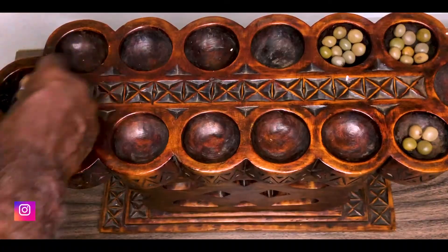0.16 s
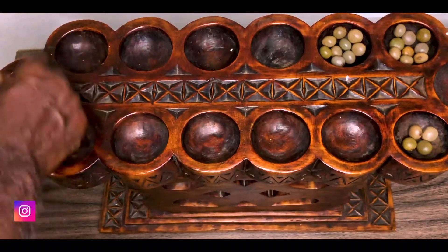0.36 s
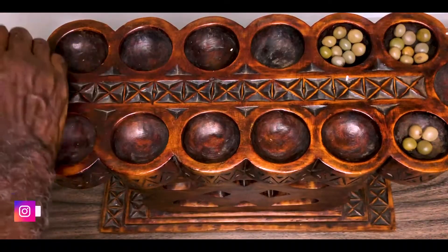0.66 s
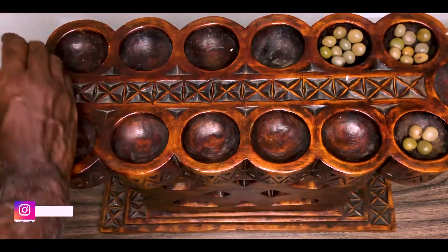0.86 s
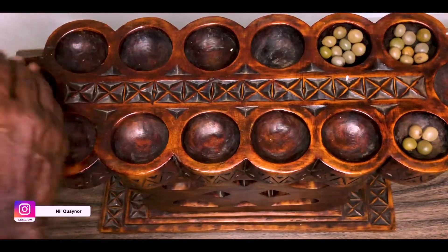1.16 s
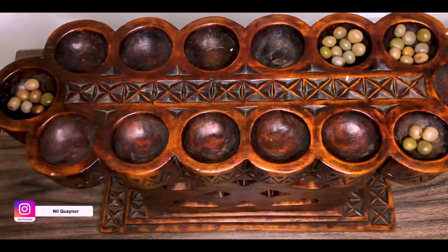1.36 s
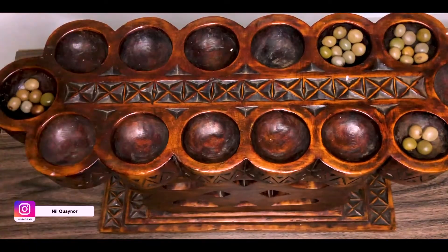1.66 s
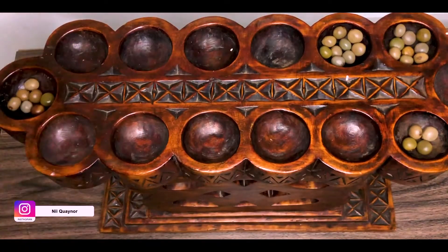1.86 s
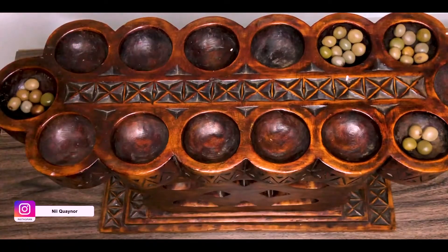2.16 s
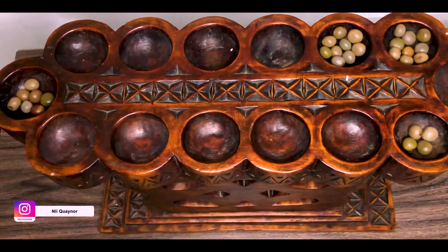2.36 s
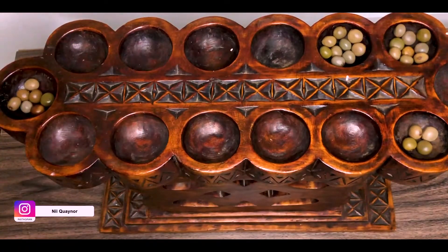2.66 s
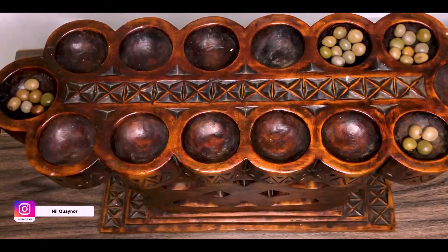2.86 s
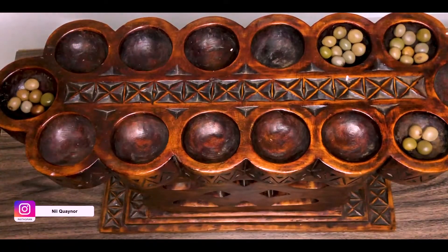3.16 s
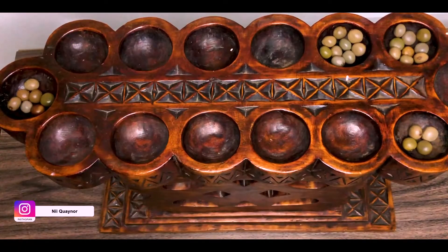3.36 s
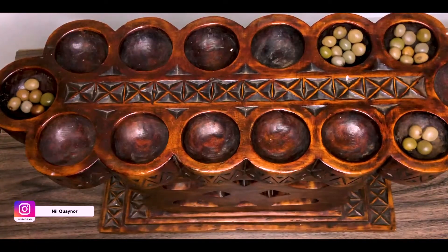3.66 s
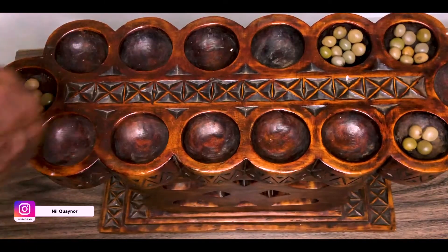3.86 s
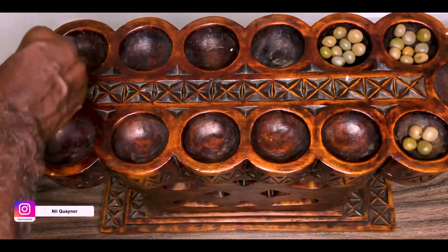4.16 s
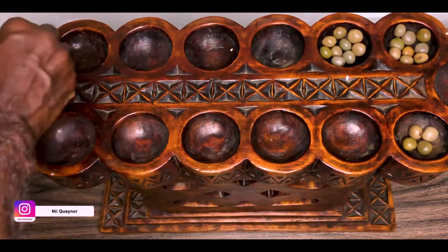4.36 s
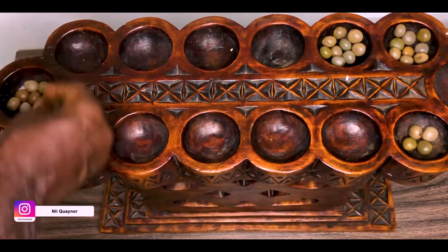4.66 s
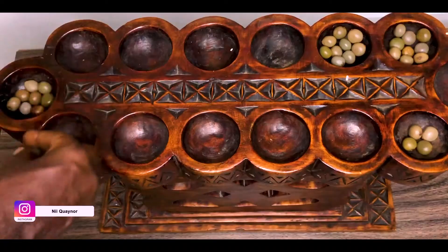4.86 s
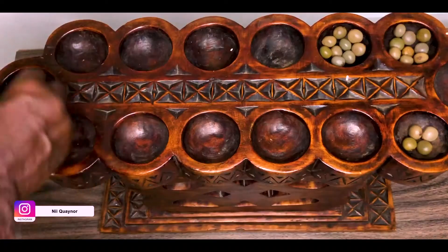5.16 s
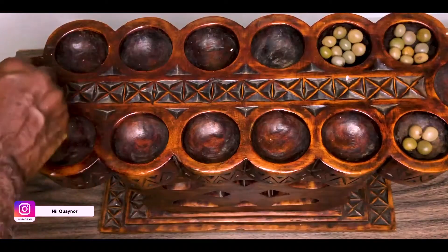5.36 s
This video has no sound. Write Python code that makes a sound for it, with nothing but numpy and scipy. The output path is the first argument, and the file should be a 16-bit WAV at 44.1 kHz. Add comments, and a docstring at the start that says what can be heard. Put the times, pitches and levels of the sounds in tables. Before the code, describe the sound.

Hard little seeds clack sharply into a carved wooden cup, then get softly stirred and gathered, with a few more bright clicks in a quiet room.

```python
"""A quiet room, where hard seeds click on each other and knock in the cups of a carved wooden board.
A hand drops seeds into the end cup, then stirs and gathers them.
Each hit is a handful of fading sine waves for shell, board and cup; stirring is many tiny random hits.
Nearby surfaces give single echoes and the walls a short tail made of scattered, fading echoes.
Beneath lie the low rumble of the room and the hiss of the microphone, both made of shaped noise."""
import sys
import numpy as np
from scipy import signal
from scipy.fft import rfft, irfft
from scipy.io import wavfile

SR = 44100
rng = np.random.default_rng(int(sys.argv[2]) if len(sys.argv) > 2 else 0)


def transcribe(signal):
    """Save signal, clipped to [-1, 1], as a 16-bit WAV file at the path in sys.argv[1]."""
    frames = np.atleast_2d(signal).T
    limited = np.clip(frames, -1, 1)
    pcm = np.round(limited * 32767).astype(np.int16)
    wavfile.write(sys.argv[1], SR, pcm)


N = 242550  # length of the scene in samples (5.5 s)

# clean blows of a seed: (t/s, shell click level/dB, shell pitch f/Hz, board knock level/dB, cup ring level/dB)
BLOWS = [(0.341, -44.5, 5870, -56, -52), (0.656, -9.5, 6550, -25, -25.5), (0.6679, -22, 6700, -33.5, -28.5),
         (0.6974, -43, 7140, -50, -53), (0.7248, -25, 6540, -41, -24), (0.7283, -6.5, 6760, -26.5, -21.5),
         (0.787, -20.5, 7000, -36, -29.5), (0.872, -24, 8300, -43, -30.5), (0.8779, -25, 7350, -40, -56),
         (0.9927, -33, 7200, -51, -41), (1.3065, -27, 6580, -22.5, -29), (1.314, -30, 5600, -34.5, -30),
         (1.3869, -36, 6080, -40.5, -34), (1.4148, -45, 5580, -54, -46), (1.475, -54, 4660, -55, -51.5),
         (1.5493, -65, 4900, -54, -49), (1.652, -45, 4530, -40, -41.5), (1.8053, -37, 5600, -39.5, -32.5),
         (1.822, -32, 6800, -50, -38), (1.85, -41, 6430, -59, -39.5), (1.8735, -41, 6310, -63, -46),
         (2.004, -32.5, 4830, -57, -35.5), (2.0572, -31.5, 7050, -44, -44), (2.0831, -58, 5130, -40.5, -46),
         (2.1118, -51, 6220, -50, -43), (2.12, -45, 4800, -50, -49), (2.1492, -50, 5300, -63, -46),
         (2.1915, -53, 4650, -43.5, -41), (2.225, -29, 6900, -48, -41), (2.2358, -25.5, 5100, -38, -38.5),
         (2.2835, -46, 6500, -62, -51), (2.312, -36.5, 5630, -63, -37.5),
         (2.3748, -35.5, 4860, -38.5, -31.5), (2.3945, -42, 5230, -34, -31.5), (2.42, -34, 5250, -49, -43),
         (2.5162, -35, 6600, -43, -37.5), (2.5243, -29, 6900, -37.5, -37), (2.536, -32, 4540, -34, -30.5),
         (2.5406, -16.5, 6460, -44, -35), (2.5836, -36, 6800, -49, -48), (2.594, -39, 4400, -32, -35),
         (2.6025, -36.5, 6300, -50, -30), (2.6297, -38, 5770, -47, -41.5), (2.685, -47, 6500, -61, -54),
         (2.7036, -38, 6560, -50, -39), (2.7848, -30, 6550, -35, -43), (2.7893, -21.5, 7100, -57, -41),
         (2.8272, -45, 7560, -36, -40), (2.838, -41, 6480, -39, -43), (2.8942, -52, 5120, -47.5, -55),
         (2.946, -57, 6200, -46, -58), (2.983, -38.5, 5900, -43.5, -40.5), (3.0234, -40.5, 5600, -42, -48),
         (3.0408, -57, 4810, -41.5, -62), (3.07, -40, 5140, -61, -58), (3.1256, -64, 6290, -42, -52),
         (3.1681, -60, 6290, -36.5, -51), (3.1936, -66, 7240, -49, -51), (3.208, -18, 7260, -31.5, -29.5),
         (3.2357, -43, 6260, -38, -48), (3.2605, -44, 7800, -45, -57), (3.2769, -51, 7120, -45, -56),
         (3.299, -48, 6900, -42, -55), (3.3171, -53, 7270, -41, -58), (3.334, -48, 6680, -51, -53),
         (3.3485, -49, 7430, -37, -58), (3.3714, -61, 7100, -36, -51), (3.3932, -62, 7800, -46, -59),
         (3.419, -57, 6300, -43, -61), (3.43, -66, 7130, -45, -60), (3.4465, -23.5, 6400, -33.5, -35),
         (3.463, -53, 6550, -34, -45), (3.4926, -33.5, 6640, -37, -35.5), (3.6409, -26.5, 6050, -38.5, -38),
         (4.1814, -9.5, 7850, -31.5, -25), (4.1894, -24, 8600, -38.5, -45), (4.21, -30, 8170, -40, -62),
         (4.2705, -35, 7520, -44.5, -47), (4.2893, -17, 8100, -41.5, -41.5), (4.3015, -38, 7000, -51, -55),
         (5.3656, -8, 8330, -29.5, -30.5), (5.3857, -22, 6830, -35, -38), (5.4138, -22, 6340, -37.5, -31)]
# short slides of a seed: the same five columns, then (longest duration/ms, snap level against the click/dB)
SLIDES = [(0.7204, -20, 7050, -34, -39, 3.5, -10), (0.8534, -14, 6650, -33.5, -23, 3.07, -17),
          (1.2918, -28.5, 6040, -27.5, -29, 2.2, -5), (1.3208, -24.5, 6900, -37.5, -27.5, 8.2, -17),
          (1.7294, -33, 6500, -38.5, -37, 2.74, -31), (1.776, -34, 7530, -33, -35.5, 7, -26),
          (1.913, -30.5, 5900, -41, -33.5, 8.8, -4.5), (2.014, -55, 7680, -32, -37.5, 12.2, -15),
          (2.2033, -32.5, 6450, -38.5, -38.5, 5.3, -9), (2.3586, -26, 6760, -37, -36, 4.3, -16),
          (2.7387, -34, 4300, -44, -37, 13, -27), (2.757, -48, 4300, -38, -37.5, 6, -19),
          (2.998, -33.5, 4500, -45.5, -43, 15.7, -12), (3.784, -38, 6100, -40.5, -42.5, 12, -3),
          (4.2325, -16.5, 7400, -41, -25.5, 2.2, -6.5)]
SNAP_BLOW_DB = -15.5  # starting level of the snap in a clean blow, against the click


def seed_hits(direct, all_round):
    """Adds every blow and slide, both as heard directly and as sent out towards the walls."""
    contacts = [(row, 0, SNAP_BLOW_DB) for row in BLOWS]
    contacts += [(row, row[5], row[6]) for row in SLIDES]
    chance = rng.standard_normal((len(contacts), 4, 39))
    slips = rng.random((len(contacts), 14))
    tail_damping = 0.4  # shell and cup rings blur together from all sides: share of their ring time
    for (row, length_ms, snap_db), luck, slip in zip(contacts, chance, slips):
        add(direct, row[0], contact(row, luck, slip, length_ms, snap_db))
        # towards the walls: one even blow, halfway through the longest duration of the slide
        even_blow = blow(row, 0 * luck, 0.5, snap_db, tail_damping)
        add(all_round, row[0] + length_ms / 2000, even_blow)


def contact(row, chance, slips, length_ms, snap_db):
    """A clean blow, or a slide: a seed that slips many times makes a run of small blows."""
    at = (slips ** 1.5 * length_ms * SR / 1000).astype(int)  # slips crowd towards the start
    train = np.bincount(at - at.min()).astype(float)
    return np.convolve(blow(row, chance, 0.72, snap_db), train / np.linalg.norm(train))


# highest shell modes: (f/Hz, relative level/dB, time to fall 60 dB t/s)
SNAP = [(10940, 8.5, 0.0093), (11800, 15, 0.0031), (14040, -1, 0.0057), (13200, -17, 0.00059),
        (15100, 0, 0.0025)]
SNAP_TO_CUP = 0.41  # share of the snap's level that follows the cup ring rather than the click
SNAP_DB_PER_OCTAVE = 12  # higher shells snap more
# the whole board on the table: (f/Hz, relative level/dB, time to fall 60 dB t/s)
THUMP = [(215, 0, 0.022), (305, 0, 0.021)]
THUMP_DB = -19  # thump level against the board knock
CUP_HZ, CUP_SPREAD = 3190, 0.035  # centre of the cup ring, and how far the struck spot moves it


def blow(row, chance, focus, snap_db, ring_share=1):
    """A seed's shell clicks and snaps, the cup wall rings and the board knocks; focus narrows the colour."""
    s, shell_db, shell_hz, knock_db, cup_db = row[:5]
    snap_db = snap_db + shell_db + SNAP_TO_CUP * (cup_db - shell_db)
    snap_db += SNAP_DB_PER_OCTAVE * np.log2(shell_hz / 6500)
    cup_hz = CUP_HZ * np.exp(CUP_SPREAD * chance[3, -1])

    shell_modes = damped(shell_near(shell_hz, focus * 25.7), ring_share)
    board_modes = board_near(knock_pitch(s), focus * 23.8)
    cup_modes = damped(cup_near(cup_hz, focus * 16.2), ring_share)
    click = ring(shell_modes, chance[0], ring_share * 0.0003, detune=0.024)
    snap = ring(SNAP, chance[1], 0.0001, detune=0.013)
    knock = ring(board_modes, chance[2], 0.00065, detune=0.018)
    thump = ring(THUMP, chance[1, ::-1], 0.0013)
    cup_ring = ring(cup_modes, chance[3], 0.00038)

    sound = np.zeros(2000)
    add(sound, 0, gain_of(shell_db) * click)
    add(sound, 0, gain_of(snap_db) * snap)
    add(sound, 0, gain_of(knock_db) * knock)
    add(sound, 0, gain_of(knock_db + THUMP_DB) * thump)
    add(sound, 0, gain_of(cup_db) * cup_ring)
    return sound


# modes (natural tones) of the dry shells: (f/Hz, relative level/dB)
SHELL = [(4300, -7.5), (5200, -2), (5750, 0), (6250, 3), (6750, 1.5), (7500, 0), (8100, 1.5), (8700, 1),
         (9500, -4), (10400, -5.5)]


def shell_near(centre_hz, fall_db):
    """The shell's modes around the pitch of this seed; all die very fast, 60 dB in 4.5 ms."""
    return [(hz, db, 0.0045) for hz, db in near(SHELL, centre_hz, fall_db)]


# modes of the board: (f/Hz, relative level/dB)
BOARD = [(340, -9), (440, -9), (562, -8.5), (640, -10), (745, -4), (830, -7.5), (910, 0.5), (1060, 1.5),
         (1170, 3.5), (1270, 3), (1390, -22), (1565, -6.5), (1750, -4.5)]
BOARD_T60 = 0.029  # time for a 700 Hz board mode to fall 60 dB, s


def board_near(centre_hz, fall_db):
    """The board's modes around the pitch that the struck cup favours; wood damps high modes much sooner."""
    weighted = near(BOARD, centre_hz, fall_db)
    return [(hz, db, BOARD_T60 * min(700 / hz, 1.2) ** 1.7) for hz, db in weighted]


# the board knocks low at its end cup, higher where the seeds are stirred: (t/s, centre of the knock f/Hz)
KNOCK_PITCH = [(0.6, 690), (1.1, 755), (1.28, 1053), (1.7, 1060), (2.0, 1270), (2.3, 1154), (2.6, 1060),
               (2.82, 1280), (2.98, 1073), (3.17, 1167), (3.2, 866), (3.5, 1000), (3.8, 1240), (4.1, 614),
               (5.5, 686)]


def knock_pitch(s):
    """The pitch that the struck part of the board favours at time s."""
    return np.interp(s, *np.transpose(KNOCK_PITCH))


# modes of the cup wall: (f/Hz, relative level/dB)
CUP = [(1600, 7.5), (1900, 3.5), (2200, 5), (2500, 3.5), (2850, 4), (3200, -3), (3550, 0.5), (3900, 1.5),
       (4300, -1)]


def cup_near(centre_hz, fall_db):
    """The cup wall's modes around the pitch of the struck spot; each falls 60 dB in 9 ms."""
    return [(hz, db, 0.009) for hz, db in near(CUP, centre_hz, fall_db)]


# seeds rolling and rubbing under the fingers: (t/s, wood rattle level/dB, shell rustle level/dB)
STIRRING = [(1.3, -71, -62), (1.45, -68, -78), (1.6, -72, -85), (1.72, -73, -75), (1.8, -62, -60),
            (1.894, -61.5, -68), (2.09, -53.5, -66), (2.17, -64, -71), (2.26, -56, -56), (2.34, -54.5, -65),
            (2.46, -64, -70), (2.62, -68, -59), (2.73, -55.5, -63.5), (2.9, -68, -77), (3.03, -51, -64),
            (3.16, -73, -82), (3.28, -59.5, -60), (3.42, -63.5, -79), (3.55, -90, -90)]
ROLL_LOW_HZ, ROLL_HIGH_HZ = 776, 1371  # range of the rolling knocks' centres
ROLL_SPREAD = 0.08  # scatter of these knocks about the knock pitch


def stirring(wood_per_s=300, shell_per_s=1400, spread_db=5.0):
    """Many tiny uneven touches: seeds roll on the board and rub on each other."""
    s, wood_db, shell_db = np.transpose(STIRRING)
    t, wood, shells = np.arange(N) / SR, np.zeros(N), np.zeros(N)
    size = gain_of(spread_db * np.minimum(rng.exponential(1, N), 4))
    draw = rng.random(N)  # decides at which samples a touch happens
    kind = rng.integers(0, 8, N)
    chance = rng.standard_normal((8, 3, 39))
    spots = np.geomspace(ROLL_LOW_HZ, ROLL_HIGH_HZ, 8)
    wanted = knock_pitch(t) * np.exp(ROLL_SPREAD * rng.standard_normal(N))
    spot = np.rint(np.interp(wanted, spots, np.arange(8)))

    for k in range(8):
        rolls = size * (spot == k) * (draw < wood_per_s / SR)
        knock = ring(board_near(spots[k], 16), chance[k, 0], 0.001, uneven_db=4.0)
        add(knock, 0, ring(cup_near(5800, 6.4), chance[k, 1], 0.00035))
        wood += signal.oaconvolve(rolls, knock)[:N]

        rubs = size * (kind == k) * (draw > 1 - shell_per_s / SR)
        rub = ring(shell_near(5000, 5), chance[k, 2], 0.0002)
        shells += signal.oaconvolve(rubs, rub)[:N]

    wood_level = gain_of(np.interp(t, s, wood_db, left=-120, right=-120))
    shell_level = gain_of(np.interp(t, s, shell_db, left=-120, right=-120))
    return wood_level * evened(wood) + shell_level * evened(shells)


# single echoes from cup rim, hand and table: (delay t/s, level/dB)
NEAR_ECHOES = [(.0015, -9), (.0036, -16), (.0115, -21)]


def near_echoes(x):
    """A few single reflections from surfaces close to the seeds: delayed, quieter copies."""
    out = x.copy()
    for delay, db in NEAR_ECHOES:
        add(out, delay, gain_of(db) * x)
    return out


# how long the walls keep each pitch: (f/Hz, time to fall 60 dB t/s)
WALLS = [(400, 0.47), (1000, 0.37), (3000, 0.26), (7000, 0.37), (11000, 0.12), (16000, 0.16)]
# how strongly each pitch starts in the tail: (f/Hz, relative level/dB)
WALL_COLOUR = [(400, 11), (900, -1), (1600, 12.5), (4000, 6), (8000, 1.3), (14000, 12)]


def walls(x):
    """Three sparse tails, each band dying at its own speed, fed in turn so that like hits differ."""
    out = np.zeros(N)
    turn = 2 * np.pi * 3.7 * np.arange(N) / SR  # 3.7 turns a second
    for k in range(3):
        taps = np.zeros(SR)
        at = np.arange(120, SR - 20, 20)
        taps[at + rng.integers(0, 20, len(at))] = rng.choice([-1., 1.], len(at))
        hz, t, z = signal.stft(taps, SR, nperseg=256)
        z *= gain_of(read(WALL_COLOUR, hz)[:, None] - 60 * t / read(WALLS, hz)[:, None])
        z *= 1 + 1.08 * np.exp(-t / 0.0082)  # close furniture thickens the start of the tail
        tail = signal.istft(z, SR, nperseg=256)[1]
        share = np.sqrt(2 / 3) * np.cos(turn + k * 2 * np.pi / 3)
        out += signal.fftconvolve(x * share, tail / np.linalg.norm(tail))[:N]
    return out


# colour of the room rumble and microphone hiss: (f/Hz, relative level/dB)
AIR = [(18, -31), (30, 4), (66, -12), (208, -4.5), (263, -6.5), (300, -7), (333, -11.5), (481, -9),
       (520, -15.5), (562, -10.5), (770, -16), (949, -18), (2370, -27.5), (15600, -29.5)]
AIR_DB = -57  # average (RMS) level of this noise
# fuzzy room tones: (f/Hz, width/Hz, level/dB)
HUMS = [(73.8, 43, -61), (121.4, 16, -65.5), (243.5, 50, -68), (299.1, 2.1, -71.5), (555.2, 8.2, -71)]


def air():
    """Steady noise with shaped pitch content, plus a few fuzzy low tones made of narrow noise bands."""
    hz = np.fft.rfftfreq(N, 1 / SR)
    out = gain_of(AIR_DB) * shaped_noise(gain_of(read(AIR, hz)))
    for centre_hz, width_hz, db in HUMS:
        peak = 1 / (1 + (2 * (hz - centre_hz) / width_hz) ** 2)
        out += gain_of(db) * shaped_noise(peak)
    return out


def shaped_noise(gains):
    """White noise with each frequency scaled by its gain, brought to an RMS of 1."""
    return evened(irfft(rfft(rng.standard_normal(N)) * gains, N))


def ring(modes, chance, rise, detune=0.019, uneven_db=2.5):
    """One blow on a set of modes, peak 1; the spot that is struck shifts and reweights them a little."""
    hz, db, t60 = np.transpose(modes)[:, :, None]
    shift, weight = chance[:2 * len(modes)].reshape(2, -1, 1)
    t = np.arange(min(round(t60.max() * SR), 2000)) / SR
    fading = gain_of(db + uneven_db * weight - 60 * t / t60)
    waves = fading * np.sin(2 * np.pi * hz * (1 + detune * shift) * t)
    sound = waves[::2].sum(0) - waves[1::2].sum(0)  # neighbours swing in opposition
    sound *= 1 - np.exp(-t / rise)  # soft start, rise in s
    return sound / abs(sound).max()


def near(modes, centre_hz, fall_db):
    """Weights modes down, in dB per octave away from the pitch that this blow favours."""
    return [(hz, db - max(fall_db, 0) * abs(np.log2(hz / centre_hz))) for hz, db in modes]


def damped(modes, share):
    """The same modes dying sooner, so that their peaks widen."""
    return [(hz, db, share * t60) for hz, db, t60 in modes]


def gain_of(db):
    """Turns decibels into a plain multiplier."""
    return 10 ** (np.asarray(db) / 20)


def evened(x):
    """Scales a sound to an average (RMS) level of 1."""
    return x / np.sqrt(np.mean(x ** 2) + 1e-20)


def read(points, hz):
    """Reads a table between its points, on a logarithmic frequency scale."""
    f, value = np.transpose(points)
    return np.interp(np.log(hz + 1), np.log(f + 1), value)


def add(mix, s, sound):
    """Adds a sound into the mix at time s, cutting off what runs past the end."""
    part = mix[round(s * SR):][:len(sound)]
    part += sound[:len(part)]


def scene():
    """Seeds heard directly and off nearby surfaces, then the walls, then the steady background."""
    background, direct = air(), stirring()
    all_round = direct.copy()  # walls collect sound sent every way, so the hits in it have an even colour
    seed_hits(direct, all_round)
    walls_db = -2
    return (near_echoes(direct) + gain_of(walls_db) * walls(all_round) + background)[None]


def record(dry):
    """A low-pass filter: the treble ends near 15900 Hz."""
    low_pass = signal.firwin(255, 15900, window=("kaiser", 9), fs=SR)
    return signal.oaconvolve(dry, low_pass[None], "same")


dry = scene()
out = record(dry)
transcribe(out)
```